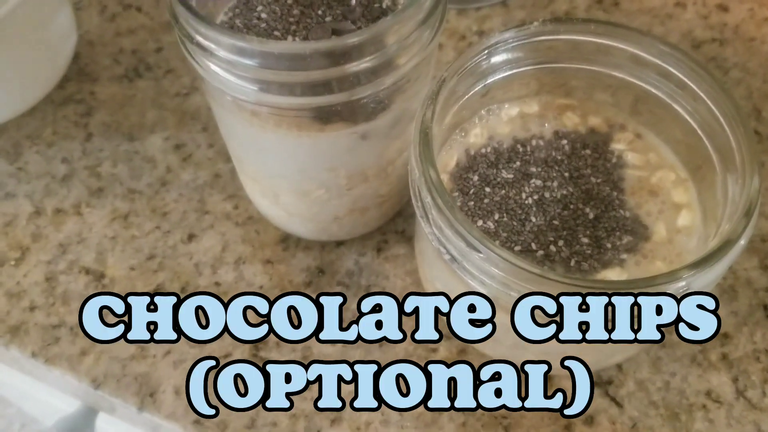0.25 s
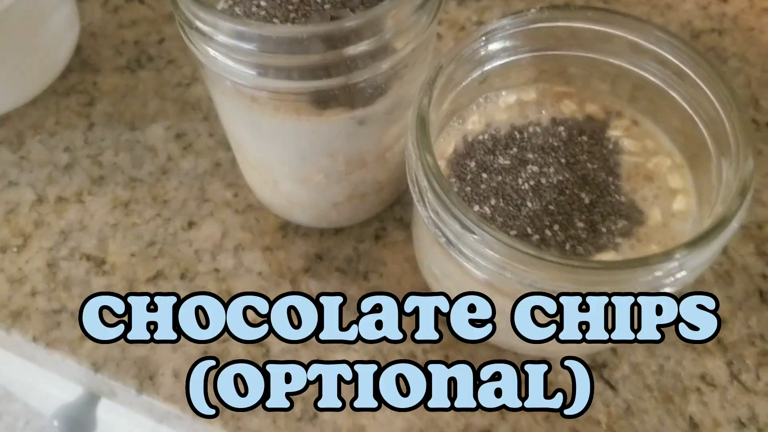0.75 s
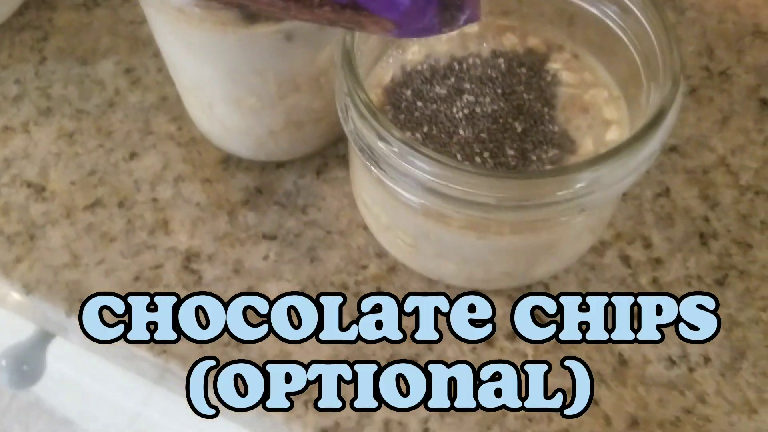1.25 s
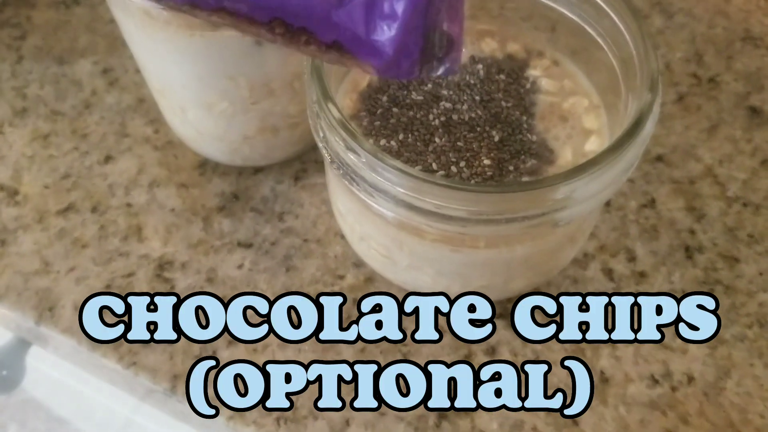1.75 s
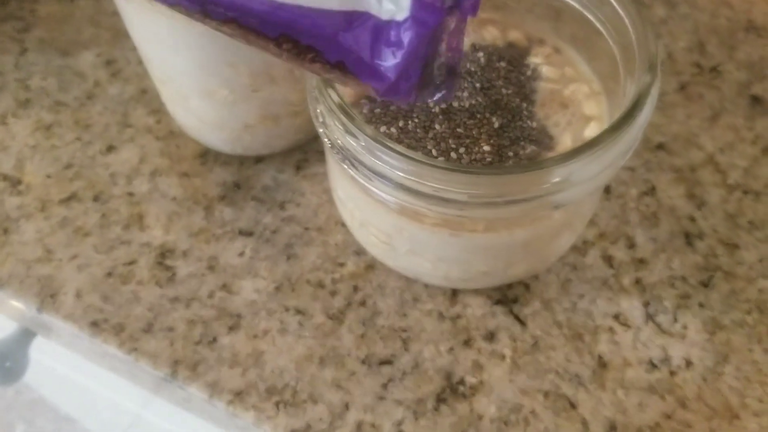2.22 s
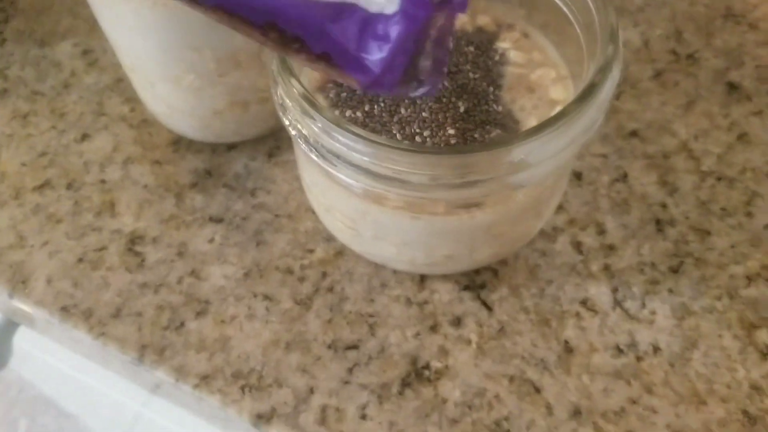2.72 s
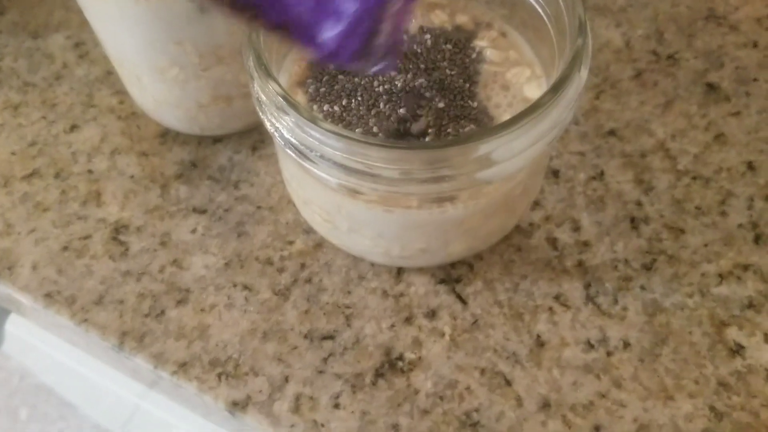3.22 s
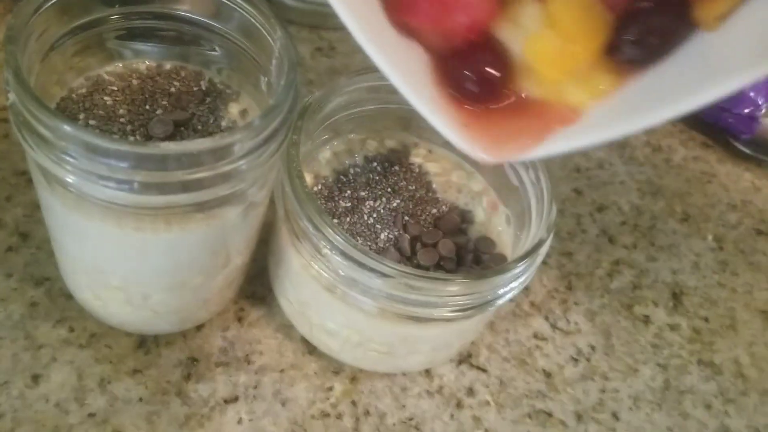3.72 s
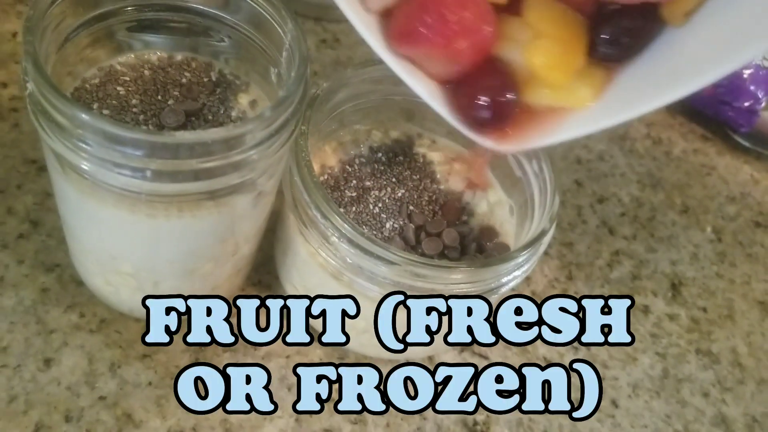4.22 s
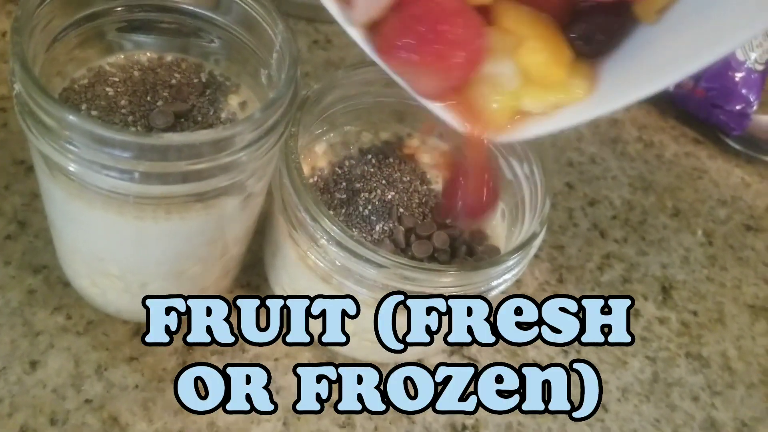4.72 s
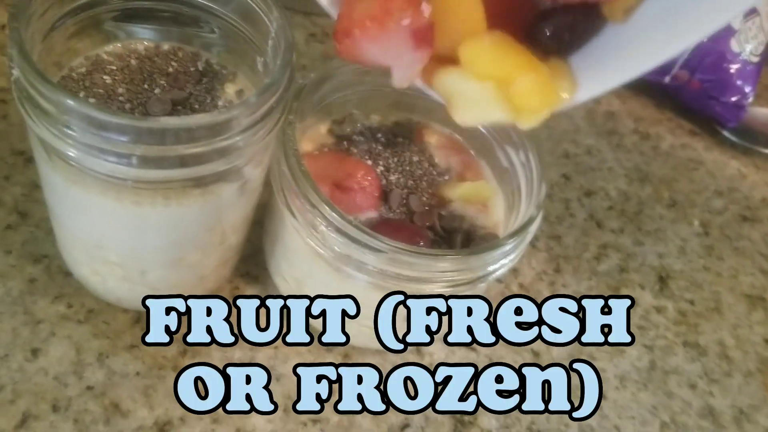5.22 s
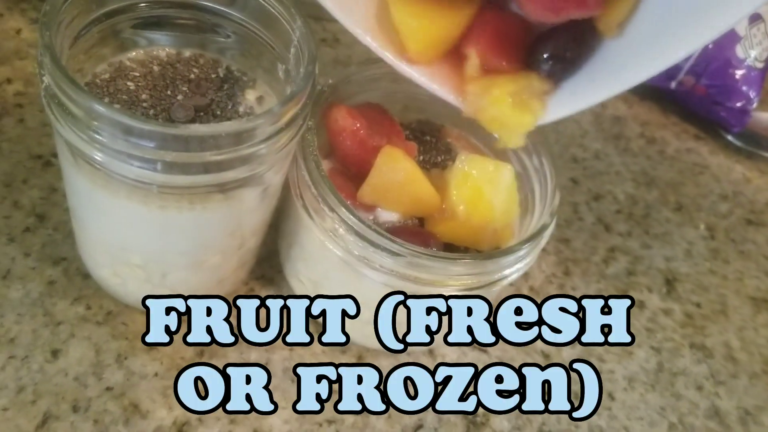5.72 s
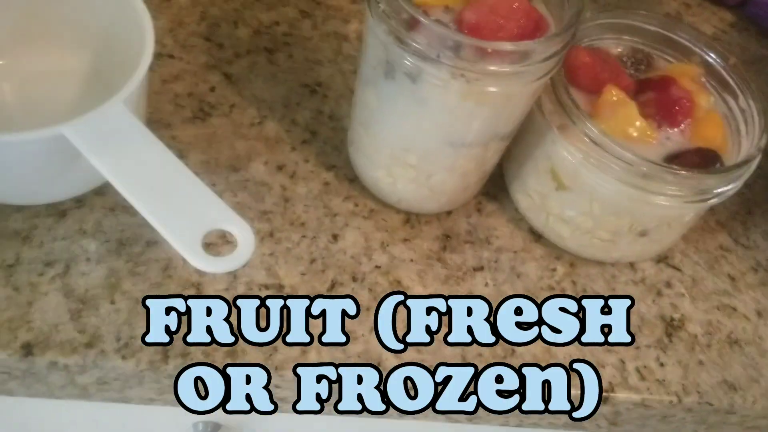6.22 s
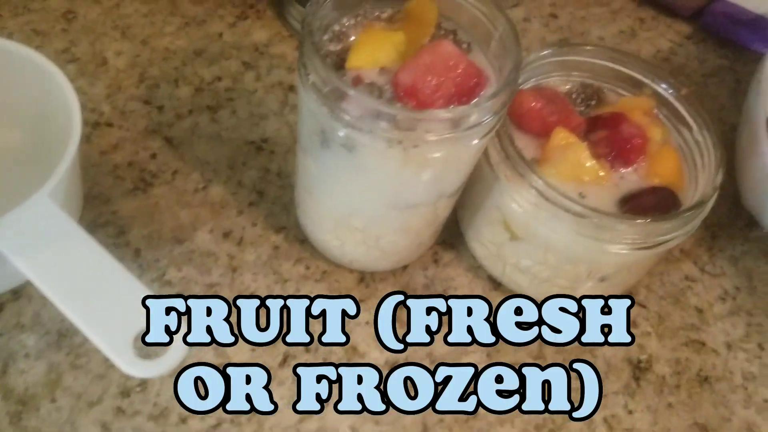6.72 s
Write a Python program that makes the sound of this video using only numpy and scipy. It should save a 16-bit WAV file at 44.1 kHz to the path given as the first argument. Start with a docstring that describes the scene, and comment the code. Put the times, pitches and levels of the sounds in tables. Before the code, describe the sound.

Close hand-held phone in a kitchen: a steady appliance hum and fan air lie under a plastic bag crinkling, sparse at first, then in sharp dense snaps as chocolate chips tick and drop into a jar. A hard cut brings a much quieter room, where wet fruit slides from a bowl with small juicy pops. The bowl knocks a jar in one rapid triple contact, and glass tinks faintly near the end.

```python
"""A plastic bag crinkles over a humming appliance: buckling film snaps, chocolate chips tick and clatter.
After a hard cut the kitchen is quieter: juice films pop as wet fruit slides from a bowl, the bowl knocks
on a jar of oats in three quick contacts, and glass tinks. Noise bursts and grains make snaps and pops;
decaying sines make the ringing. A hand-held phone hears it close by: its left port is muffled and hears
most sounds slightly later, with room reflections around them."""
import sys
import numpy as np
from scipy import signal
from scipy.fft import rfft, irfft
from scipy.io import wavfile
from scipy.ndimage import uniform_filter1d

SR = 44100
rng = np.random.default_rng(int(sys.argv[2]) if len(sys.argv) > 2 else 0)


def wav_record(signal):
    """Record a signal, one row per channel, as 16-bit PCM in the file named by sys.argv[1]."""
    frames = np.transpose(np.atleast_2d(signal))
    bounded = np.clip(frames, -1, 1)
    # unit amplitude maps onto the largest positive 16-bit level
    quanta = np.round(bounded * 32767).astype(np.int16)
    wavfile.write(sys.argv[1], SR, quanta)


N = 306495
TIME = np.arange(N) / SR
CUT_S = 3.573  # the bag scene gives way to the fruit scene
PORT_LAG_S = 0.00056  # the left port hears this much later

# the bowl chattering on the jar rim: (time [s], relative level [dB], decay constant of the contact [ms])
KNOCK_CONTACTS = [(5.0912, 0, .02), (5.09273, 6.2, .2), (5.09382, 8.7, .8)]


def undb(db):
    """Level to amplitude: 20 dB is a factor of ten."""
    return 10 ** (np.asarray(db) / 20)


def unit(x):
    """Normalise the mean power: scale to rms 1."""
    return x / np.sqrt(np.mean(x ** 2))


def fade(t60, size=N):
    """Exponential decay, as of linear damping: 60 dB down after t60 [s]."""
    return np.exp(-np.log(1000) * TIME[:size] / t60)


def bell(s, half):
    """Gaussian swell around time s, down to 1/e at half [s] to either side."""
    return np.exp(-((TIME - s) / half) ** 2)


def add(track, s, sound):
    """Superposition: mix a sound into a track at time s."""
    i = max(int(s * SR), 0)
    track[i:i + len(sound)] += sound[:N - i]


def response(points, size=4096):
    """Minimum-phase impulse response of a (Hz, dB) spectrum, by folding its cepstrum to be causal."""
    hz, db = np.transpose(points)
    bins = np.maximum(np.fft.rfftfreq(size, 1 / SR), 1)
    level_db = np.interp(np.log(bins), np.log(hz), db)
    cepstrum = irfft(np.log(undb(level_db)))
    cepstrum[1:size // 2] *= 2
    cepstrum[size // 2 + 1:] = 0
    return irfft(np.exp(rfft(cepstrum)))


def through(x, h):
    """Linear system: convolve a sound with an impulse response."""
    return signal.fftconvolve(x, h)[:N]


def colour(x, points):
    """Spectral shaping by a filter of unit energy, which keeps the power of white sound."""
    h = response(points)
    return through(x, h / np.linalg.norm(h))


def lowpass(x, hz):
    """One-pole low-pass: a gentle 6 dB per octave slope above hz."""
    return signal.sosfilt(signal.butter(1, min(hz, SR / 2 - 1), fs=SR, output="sos"), x)


def late(x, lag_s):
    """Propagation delay: a longer way through the air."""
    return np.interp(TIME - lag_s, TIME, x)


def walk(rate):
    """Slow random fluctuation of rms 1: noise drawn at rate [Hz] and smoothed twice."""
    k = int(SR / rate)
    steps = np.repeat(rng.standard_normal(N // k + 1), k)
    smooth = uniform_filter1d(uniform_filter1d(steps, k), k)
    return unit(smooth[:N])


def grains(rate, spread_db):
    """Shot noise of rms 1: random clicks, rate per second, a few much larger than the rest."""
    sizes = undb(spread_db * np.minimum(rng.exponential(size=N), 4))
    happens = rng.random(N) < rate / SR
    return unit(happens * sizes * rng.choice([-1, 1], N))


def burst(t60, size=8192):
    """Damped noise: a dying puff that starts near rms 1, with its energy held fixed."""
    shape = fade(t60, size=size)
    puff = rng.standard_normal(size) * shape
    return puff * np.linalg.norm(shape) / np.linalg.norm(puff)


def ring(modes):
    """Modal superposition: one second of damped sines, neighbours starting in opposite senses."""
    total = 0
    for k, (hz, db, t60) in enumerate(modes):
        sine = np.sin(2 * np.pi * hz * TIME[:SR])
        total = total + (-1) ** k * undb(db) * fade(t60, size=SR) * sine
    return total


def kitchen(x, early_db, room_db, lag_s):
    """Room reflections: direct sound, quick returns from counter and cupboards, and a diffuse tail."""
    # gain of the muffled left port: (frequency [Hz], gain [dB])
    left_port = [(60, 1), (400, 4), (530, 2), (720, 3.5), (1100, 0.5), (1500, 6), (1950, 5.5), (2400, -11),
                 (3200, -22), (4200, -29.5), (6500, -48), (10000, -33.5), (14000, -11)]

    def returns():
        """Early and late reverberation decay exponentially; the late tail loses its treble."""
        quick = burst(0.074, size=SR)
        slow = lowpass(burst(0.51, size=SR), 4574)
        h = np.zeros(N)
        add(h, 0.003, undb(early_db) * quick / np.linalg.norm(quick))
        add(h, 0.009, undb(room_db) * slow / np.linalg.norm(slow))
        return through(x, h[:SR])

    right, other = returns(), returns()
    # long waves reach both ports alike
    left = other + lowpass(right - other, hz=600)
    return np.array([through(late(x + left, lag_s), response(left_port)), x + right])


def appliance(air, waver, left_db, axis):
    """Harmonic and broadband noise: mains hum and wavering motor tones over fan air, ports alike in the bass."""
    # hum and motor: (frequency [Hz], rms level before the cut [dB], after it [dB]), before trim and flutter
    partials = [(59.7, -51, -60.5), (120.1, -45, -66), (175.7, -37, -64.5), (241.9, -49, -66.5),
                (293.3, -61, -58), (350.7, -49, -68.5), (359.1, -57, -75.5), (529, -59, -87.5)]
    hum = 0
    for row in partials:
        phase = 2 * np.pi * (row[0] * TIME + rng.random()) + waver * walk(9.1)
        hum = hum + np.sqrt(2) * undb(row[axis] + 1.0 * walk(11)) * np.sin(phase)
    shared, own = rng.standard_normal((2, N))
    # coherence between the ports falls towards the treble
    likeness = 0.96 / (1 + (np.fft.rfftfreq(N, 1 / SR) / 1700) ** 2)
    delayed = np.roll(shared, int(PORT_LAG_S * SR))
    left = irfft(likeness * rfft(delayed) + np.sqrt(1 - likeness ** 2) * rfft(own), N)
    air = np.array(air)
    noise = np.array([through(left, response(air[:, :2])), through(shared, response(air[:, ::2]))])
    noise = np.sqrt(SR / 2) * noise * undb(0.5 * walk(8))  # the root turns dB per Hz into amplitude
    return noise + np.array([undb(left_db) * late(hum, lag_s=0.00028), hum])


def bumps(thud_hz, thud_t60):
    """Structure-borne sound: fingers bumping the phone excite two low modes, alike at both ports."""
    # fingers on the phone: (time [s], level of the lower mode [dB])
    touches = [(1.533, -17), (2.648, -20), (2.67, -16), (3.899, -41), (6.146, -34)]
    out = np.zeros(N)
    for s, db in touches:
        add(out, s, undb(db) * ring([(thud_hz, 0, thud_t60), (125, -4, 0.06)]))
    return out


def tick(s, db, t60, top_hz):
    """Low-passed impulse noise: one faint, dry, dull tick."""
    out = np.zeros(N)
    add(out, s, undb(db) * burst(t60))
    return lowpass(out, top_hz)


def whistle(s, half_s, db, top_hz, sag_hz_per_s):
    """Frequency modulation: a thin, very high tone glides up and down in pitch, swelling and fading."""
    hz = np.maximum(top_hz - sag_hz_per_s * abs(TIME - s), 0) * (1 + 0.005 * walk(90))
    return undb(db) * bell(s, half_s) * np.sin(2 * np.pi * np.cumsum(hz) / SR)


def tink(scuff_db, scuff_t60):
    """Modal excitation: glass touched lightly scuffs and rings only in its high modes."""
    # glass on glass: (frequency [Hz], level [dB], t60 [s])
    glass_modes = [(3700, -53.5, 0.14), (4970, -59, 0.11), (6250, -53.5, 0.12), (7620, -57, 0.16),
                   (10660, -53.5, 0.095)]
    touch_s = 6.414
    out = np.zeros(N)
    add(out, touch_s, ring(glass_modes))
    add(out, touch_s, undb(scuff_db) * burst(scuff_t60))
    return out


def drip(s, hz, db, t60):
    """Band-limited impact noise: a drop of juice splats dully into the jar."""
    out = np.zeros(N)
    add(out, s, undb(db) * burst(t60))
    return colour(out, [(hz / 2, -20), (hz, 0), (hz * 2, -20)])


def beads(t60):
    """Sudden release of surface tension: crisp clicks of juice letting go of the bowl."""
    # single beads snapping: (time [s], level [dB])
    releases = [(4.228, -53), (4.959, -37), (5.211, -34), (5.739, -37), (5.870, -45), (6.061, -45),
                (6.523, -40)]
    # spectrum of a bead: (frequency [Hz], relative level [dB])
    bead_colour = [(2500, -29.5), (6400, 3), (8800, -16.5), (12000, -9)]
    out = np.zeros(N)
    for s, db in releases:
        add(out, s, undb(db) * burst(t60))
    return colour(out, bead_colour)


def fruit(squelch_db, juice_db, seep_db):
    """Film rupture as shot noise: juice tears in clusters of pops; sparse ones tick on, louder near a tear."""
    # fruit peeling off the bowl and landing: (time [s], level before trim [dB], t60 [s])
    squelches = [(4.748, -33, 0.022), (4.918, -42, 0.16), (5.316, -49.5, 0.042), (5.454, -39.5, 0.041),
                 (5.946, -46.5, 0.19), (6.054, -48.5, 0.023)]
    # spectrum of wet pops: (frequency [Hz], relative level [dB])
    wet_colour = [(600, -15.5), (2500, -22), (4000, -7.5), (5200, -3), (6500, 5), (7600, -6), (8800, -12.5),
                  (10000, -1.5), (11700, 6), (13500, -5), (15500, -23.5)]
    tearing = np.zeros(N)
    for s, db, t60 in squelches:
        rise = np.minimum(TIME[:SR] / (0.07 * t60), 1)
        add(tearing, s, undb(db + squelch_db) * rise * fade(t60, size=SR))
    pops = tearing * grains(rate=14000, spread_db=1.0)
    around_tears = uniform_filter1d(tearing, int(0.38 * SR))  # average over 0.38 s
    seeping = undb(juice_db) + undb(seep_db) * around_tears
    return colour(pops + seeping * grains(rate=120, spread_db=5), wet_colour)


def thud(db, t60, crowd_db, crowd_t60):
    """High modal density acts as noise: the filled jar is shaken against the counter, weak modes linger."""
    # dense, dull thud of the filled jar: (frequency [Hz], relative level [dB])
    thud_colour = [(40, -27.5), (140, -5), (230, -5), (310, -4), (420, 0), (520, -10), (680, 0.5),
                   (930, -10.5), (1150, 2.5), (1400, 0.5), (2100, -10.5), (2900, -13.5), (4200, -36.5)]
    # the many weak, crowded modes of bowl and jars: (frequency [Hz], relative level [dB])
    crowd_colour = [(300, -17.5), (620, -5), (900, -18), (1200, -1.5), (1600, -4.5), (2200, 0.5),
                    (2900, -4.5), (3200, 1), (3500, -4.5), (4300, -17.5), (5030, -3), (5500, -12.5),
                    (8000, -30)]
    hit_s = KNOCK_CONTACTS[1][0]
    out, crowd = np.zeros(N), np.zeros(N)
    add(out, hit_s, undb(db) * burst(t60))
    add(crowd, hit_s, undb(crowd_db) * burst(crowd_t60, size=SR))
    return colour(out, thud_colour) + colour(crowd, crowd_colour)


def knock(ring_db, crack_db, crack_t60):
    """Impact excitation of modes: three quick contacts of bowl and jar; a longer contact is duller."""
    # bowl, jar and counter ringing together: (frequency [Hz], relative level [dB], t60 [s])
    knock_modes = [(231.8, -21.5, 0.12), (425, -21, .11), (636.5, -32, 0.11), (745, -14, 0.0099),
                   (1146, -26, .13), (1244, -33, .1), (2238, -14, 0.043), (3150, -27, 0.21),
                   (3207, -9.5, .032), (5050, -13.5, 0.027), (5000, -37.5, .25), (5903, -13.5, 0.016),
                   (6534, -14.5, 0.01), (7640, -25, 0.017)]
    # spectrum of the crack: (frequency [Hz], relative level [dB])
    crack_colour = [(800, -4.5), (1500, 1.5), (2300, 6), (4200, -13.5), (6200, -2), (7500, -12.5),
                    (8800, -40.5), (11500, -7.5), (15000, -36)]
    force, crack = np.zeros(N), np.zeros(N)
    for s, db, contact_ms in KNOCK_CONTACTS:
        push = np.exp(-TIME[:SR] / (contact_ms / 1000))
        add(force, s, undb(db) * push / push.sum())
    add(crack, KNOCK_CONTACTS[0][0], undb(crack_db) * burst(crack_t60))
    # the blow comes back off the cupboards
    force = force + undb(-20) * late(force, 0.0172)
    return undb(ring_db) * through(force, ring(knock_modes)) + colour(crack, crack_colour)


def effort():
    """Driving force as a gain: a steady hold plus one Gaussian swell for each move of the hand."""
    # gripping, tipping and shaking the bag: (middle [s], swell [dB], half width at 1/e [s])
    moves = [(.28, -48.5, 0.046), (1.72, -44, 0.02), (1.862, -46, 0.027), (1.987, -50, 0.043),
             (2.26, -50.5, 0.3), (3.144, -44, 0.078), (3.296, -38.5, 0.045), (3.445, -42, 0.086)]
    held_db = -64
    return undb(held_db) + sum(undb(db) * bell(s, half) for s, db, half in moves)


def landing(db, t60, count=36):
    """Many small impacts: a handful of chips drops into the jar in a short, dull clatter of damped modes."""
    middle_s, spread_s = 3.37, 0.055
    out = np.zeros(N)
    for when, pitch, size in rng.standard_normal((count, 3)):
        hz = np.interp(pitch, [-2, 2], (1060, 2200))
        add(out, middle_s + spread_s * when, ring([(hz, db + 3 * size, t60)]))
    return out


def chips(level_db, peak_s, count=2000):
    """Random collisions: chips tick on each other and the jar at their own pitch, scaled by the shaking."""
    out, shake = np.zeros(N), effort()
    t = TIME[:600]
    swell = t / peak_s
    for when, pitch, size in rng.random((count, 3)):
        s = np.interp(when, [0, 1], (1.8, CUT_S))
        hz = 950 * 7 ** pitch
        db = level_db + 14 * size ** 4
        tone = swell * np.exp(1 - swell) * np.sin(2 * np.pi * hz * t)
        add(out, s, shake[int(s * SR)] * undb(db) * tone)
    return out


def crease(pitch, t60):
    """Snap-through of a small facet of film: a brief damped mode, pitch 0 to 1 spanning the range."""
    low_hz, high_hz = 3030, 14100
    hz = low_hz * (high_hz / low_hz) ** pitch
    return ring([(hz, 0, t60)])


def bag(snap_db, flex_db, rustle_db, sizzle_db, taut_db, snap_t60, flex_t60, crease_t60,
        buckle_db, buckle_flex_db):
    """Buckling instability: creases of film give way in sharp snaps among many tiny ones."""
    # loudest creases: (time [s], snap before trim [dB], flex of the film before trim [dB])
    loud_creases = [(0.2948, -50, -36.5), (0.5644, -21, -56), (0.7048, -30, -39.5), (1.2358, -31.5, -58),
                    (1.852, -40, -42), (1.879, -33, -37.5), (1.908, -37, -39), (1.9536, -30.5, -46),
                    (2.004, -17, -36.5), (2.0743, -19.5, -38), (2.084, -26.5, -32), (2.1512, -34, -41.5),
                    (2.2851, -14, -35.5), (2.3181, -18, -32.5), (2.33, -48, -30), (2.5383, -37, -39.5),
                    (2.556, -24, -36.5), (2.8474, -22, -33), (3.0282, -30.5, -36), (3.0944, -30, -36.5),
                    (3.149, -32.5, -34), (3.1969, -28.5, -37), (3.2405, -29, -44), (3.344, -34, -48),
                    (3.3697, -31, -38.5), (3.409, -35, -51), (3.44, -30, -59), (3.464, -17, -45),
                    (3.4678, -23, -57), (3.487, -30, -50), (3.525, -25, -55), (3.5555, -26, -53),
                    (3.564, -19.5, -62)]
    # spectra of snap, flexing film and taut film: (frequency [Hz], relative level [dB])
    snap_colour = [(1000, -13.5), (3500, -15), (5200, -3), (6500, 5.5), (7600, -11), (8800, -17.5),
                   (10000, -6.5), (11800, -2), (13500, -14.5), (15500, -20)]
    flex_colour = [(400, -11), (900, -3.5), (1500, -0.5), (2300, -4), (3300, 4), (4500, 1), (7000, -3.5),
                   (14000, -26)]
    sizzle_colour = [(5000, -40), (9000, 1), (11500, 12), (13300, 12.5), (15500, -10)]
    snaps, flexes = np.zeros(N), np.zeros(N)
    for s, high_db, low_db in loud_creases:
        add(snaps, s, undb(high_db + snap_db) * burst(snap_t60))
        add(flexes, s, undb(low_db + flex_db) * burst(flex_t60))
    pull = effort()
    pull_db = 20 * np.log10(pull)
    # 170 lesser creases over a range of 15.5 dB give way at random, scaled by the pull
    buckles = np.zeros(N)
    for when, size, pitch in rng.random((170, 3)):
        s = when * CUT_S
        add(buckles, s, pull[int(s * SR)] * undb(15.5 * size ** 2) * crease(pitch, crease_t60))
    flexes = flexes + undb(buckle_flex_db) * buckles
    rustle = undb(pull_db + rustle_db + 5.7 * walk(60)) * grains(rate=1400, spread_db=3.0)
    creases = undb(buckle_db) * buckles + rustle
    # the harder the film is pulled, the brighter it crackles and snaps
    sizzle = undb(sizzle_db + 1.8 * (pull_db + 37.5) + 6.1 * walk(65)) * grains(rate=4300, spread_db=0.5)
    sizzle = sizzle + undb(2 * (pull_db - taut_db)) * snaps
    sharp = colour(snaps + creases, snap_colour)
    return sharp + colour(flexes, flex_colour) + colour(sizzle, sizzle_colour)


def scene():
    """Superposition of sources: the bag by the loud appliance, then a hard cut to the quieter kitchen."""
    # fan air and room noise by the loud appliance: (frequency [Hz], left [dB per Hz], right [dB per Hz])
    near_air = [(33.9, -93, -57), (64.6, -56.5, -79.5), (131, -69, -58), (330, -68, -71), (573, -73, -77),
                (687, -67.5, -76), (1072, -84.5, -80.5), (2067, -81, -81.5), (2327, -88, -91.5),
                (3080, -110, -92), (6760, -124, -95), (8200, -130, -109), (11530, -116, -101),
                (14800, -109, -106)]
    # the same in the quieter kitchen: (frequency [Hz], left [dB per Hz], right [dB per Hz])
    far_air = [(36, -77, -76.5), (59.24, -67, -74.5), (127, -85, -84), (294, -72, -76), (570, -88, -91.5),
               (693, -86.5, -103), (1010, -105, -103), (1360, -101, -104), (1508, -87.5, -100),
               (1840, -106, -111), (3180, -116, -117), (6770, -125, -110), (8500, -129, -122),
               (11400, -118, -106.5), (14800, -110, -113)]
    crinkle = bag(snap_db=-2.4, flex_db=7.5, rustle_db=-7.5, sizzle_db=-54.0, taut_db=-43.5,
                  snap_t60=0.013, flex_t60=0.0086, crease_t60=0.006, buckle_db=-3, buckle_flex_db=-4)
    crinkle = crinkle + chips(level_db=-6, peak_s=0.0025 / 8) + landing(db=-35, t60=0.0049)
    crinkle = crinkle + whistle(s=0.78, half_s=0.12, db=-61, top_hz=15700, sag_hz_per_s=12500)
    first = kitchen(crinkle, early_db=-9.0, room_db=-17.0, lag_s=PORT_LAG_S)
    first = first + appliance(air=near_air, waver=0.05, left_db=2.1, axis=1)

    wet = fruit(squelch_db=2.5, juice_db=-75.5, seep_db=-10.5)
    wet = wet + drip(s=3.865, hz=2480, db=-51, t60=0.023)
    second = kitchen(wet, early_db=-6, room_db=-10, lag_s=PORT_LAG_S)
    second = second + tick(s=5.905, db=-39, t60=0.0034, top_hz=1490)
    crisp = beads(t60=0.0044) + tink(scuff_db=-59, scuff_t60=0.04)
    second = second + kitchen(crisp, early_db=-11.5, room_db=-14.5, lag_s=PORT_LAG_S)
    blow = knock(ring_db=-1.5, crack_db=-14, crack_t60=0.022)
    blow = blow + thud(db=-26, t60=0.15, crowd_db=-30.5, crowd_t60=0.39)
    second = second + kitchen(blow, early_db=-17, room_db=-19, lag_s=0.00011)
    second = second + appliance(air=far_air, waver=0.85, left_db=2.5, axis=2)
    return np.where(TIME < CUT_S, first, second) + bumps(thud_hz=68.6, thud_t60=0.032)


def record(dry):
    """Band limiting: the phone drops the deepest rumble and cuts the top steeply."""
    dry = signal.sosfilt(signal.butter(6, 36, "high", fs=SR, output="sos"), dry)
    return signal.sosfilt(signal.ellip(8, 0.2, 70, 15550, fs=SR, output="sos"), dry)


dry = scene()
out = record(dry)
wav_record(out)
```